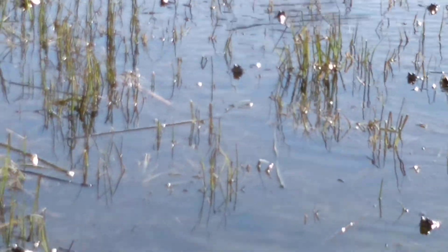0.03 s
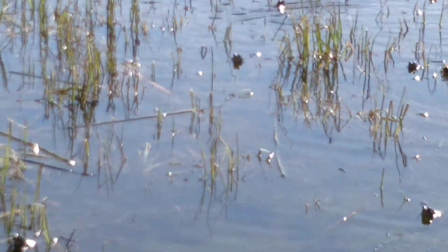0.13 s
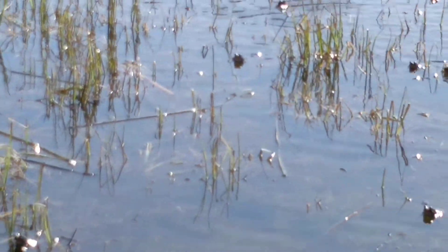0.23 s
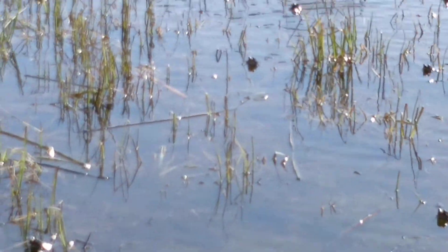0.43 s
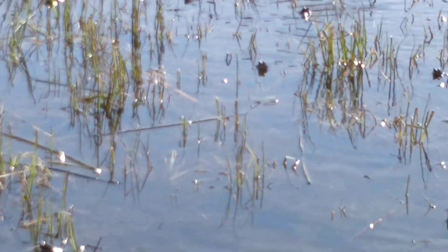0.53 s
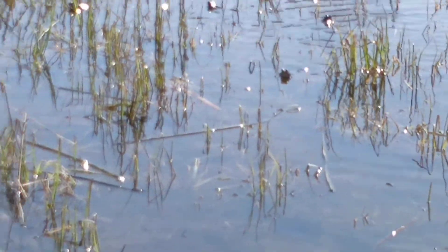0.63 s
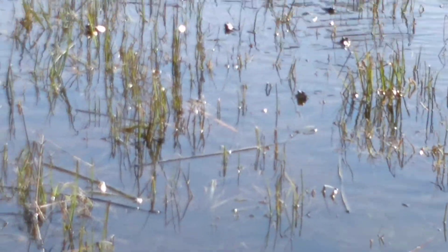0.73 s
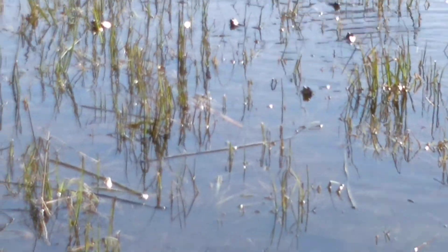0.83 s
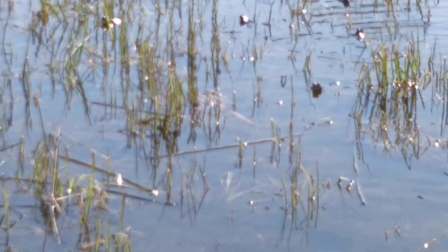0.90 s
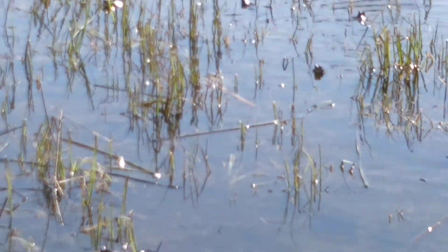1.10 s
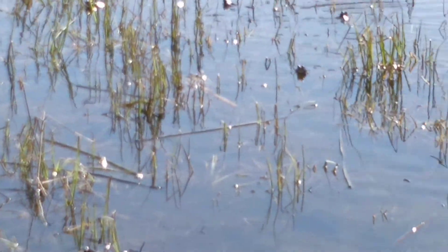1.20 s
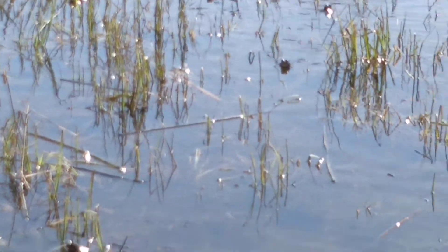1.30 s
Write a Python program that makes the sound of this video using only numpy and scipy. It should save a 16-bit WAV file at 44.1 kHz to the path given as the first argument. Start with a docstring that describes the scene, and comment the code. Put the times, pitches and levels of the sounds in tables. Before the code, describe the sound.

Frogs croak in a low, purring chorus across a shallow pond while a light breeze pops and rumbles on the microphone. Small birds chirp faintly far off. A nearer frog croaks twice, the second time over a soft rustle.

```python
"""A shallow pond. From the start, far frogs purr in a chorus of low croaks, each a run of pulses ringing
a throat, and small birds whistle, chip and twitter in the distance over a faint hiss of air. A light
breeze pops and rumbles on the microphone ports, mostly the right one. At 0.7 s a nearer frog croaks.
Just after 1 s the breeze dies and a soft rustle comes in; the near frog croaks again, and one tick
snaps out of the rustle before it fades."""
import sys
import numpy as np
from scipy import signal
from scipy.fft import rfft, irfft, next_fast_len
from scipy.io import wavfile
from scipy.ndimage import map_coordinates

SR = 44100
rng = np.random.default_rng(int(sys.argv[2]) if len(sys.argv) > 2 else 0)


def pcm_store(signal):
    """Save signal as 16-bit PCM."""
    levels = np.round(np.clip(np.atleast_2d(signal), -1, 1) * 32767)
    wavfile.write(sys.argv[1], SR, levels.astype(np.int16).T)


N = 59535

# swell and fade over the five knocks of a far croak: level/dB
FAR_ACCENTS = [-4.5, -2, 1.5, -4.5, -0.5]
# throat resonances of the far frogs: f/Hz, level/dB, t60/s
FAR_THROAT = [(451.5, 2.5, 0.041), (550.5, -1.5, 0.031), (710.6, -5, 0.021)]
# chorus EQ: f/Hz, level/dB
CHORUS_EQ = [(150, -37), (290, -10), (390, -5.5), (600, 2.5), (800, -3.5), (1200, -14.5), (3000, -28)]
# chorus fader, before its trim: t/s, level/dB
CHORUS_FADER = [(0, -50.5), (.2, -51.5), (.38, -49), (.58, -51.5), (.8, -51), (.98, -56), (1.2, -48.5),
                (1.35, -53.5)]
# resonances of the near frog's throat and vocal sacs: f/Hz, level/dB, t60/s
NEAR_THROAT = [(442, -5, 0.051), (750, 6.5, 0.013), (880, -24, 0.0083)]
# pulses that drive that throat, two croaks of five: t/s, level/dB
NEAR_KNOCKS = [(0.7102, -36), (.7302, -33), (0.7522, -35), (0.7746, -37), (0.7951, -39.5), (1.1092, -35.5),
               (1.1306, -33.5), (1.1553, -33), (1.1783, -36), (1.2004, -37)]
# near frog EQ: f/Hz, level/dB
NEAR_EQ = [(150, -12), (300, 0), (1000, 0), (1300, -12), (2000, -20)]

# eddies popping on a port: t/s, level/dB, width/s, port (0 left, 1 right)
EDDIES = [(0.1447, -27.5, 0.0022, 1), (0.16, -30, 0.0031, 1), (0.2147, -26, 0.0027, 1),
          (.285, -6, 0.0012, 1), (0.3148, -32.5, .003, 1), (0.4304, -23, 0.0026, 1),
          (.4468, -17, 0.0015, 1), (0.4954, -24.5, 0.0034, 0), (0.563, -25, 0.0025, 0),
          (0.6809, -12, 0.0018, 1), (.687, -20.5, .002, 1), (0.6965, -12.5, 0.0019, 1),
          (0.7115, -16.5, 0.0015, 0), (0.7105, -21.5, .0013, 1), (0.8277, -18.5, 0.0026, 1),
          (0.8882, -26, 0.0022, 1), (0.9771, -21.5, 0.0017, 1), (1.0026, -21.5, 0.0031, 1),
          (1.0192, -20, 0.0032, 1)]
# wind rumble EQ: f/Hz, level/dB
RUMBLE_EQ = [(12, -8), (30, -2.5), (80, -4.5), (150, -12), (230, -22), (330, -33.5), (500, -53),
             (1200, -81)]
# rumble fader, left port: t/s, level/dB
RUMBLE_LEFT = [(0, -44.5), (.12, -58.5), (.24, -40), (.3, -51), (.42, -52), (.49, -37), (.57, -48),
               (.64, -45), (.71, -44), (.79, -48.5), (.86, -58), (.96, -65), (1.01, -39), (1.08, -56),
               (1.2, -73), (1.35, -61.5)]
# rumble fader, right port: t/s, level/dB
RUMBLE_RIGHT = [(0, -52), (.08, -40), (.115, -47), (.15, -55), (.26, -28), (.39, -42), (.44, -36),
                (.52, -44), (.62, -41.5), (.7, -27.5), (.76, -39), (.94, -38), (.99, -25.5), (1.03, -29.5),
                (1.06, -49.5), (1.22, -58), (1.35, -67)]
# EQ of the fizz around each pop: f/Hz, level/dB
FIZZ_EQ = [(200, -12), (450, 11), (700, 0), (1100, -17.5), (3000, -21.5), (6000, -34.5)]

# cues for the raspy bird chips, before their trim: t/s, level/dB
CHIPS = [(0.0426, -46.5), (0.1855, -47.5), (0.3345, -50.5), (0.9019, -47.5)]
# a chip's tone with the beak open: f/Hz, level/dB
BEAK_OPEN_EQ = [(1400, -48), (1870, 2.5), (2200, 15), (2420, 13), (2650, -10.5), (2950, 6), (3250, 3),
                (3900, -28)]
# and with the beak still shut: f/Hz, level/dB
BEAK_SHUT_EQ = [(1400, -59), (1870, -2), (2200, -29), (2700, -5.5), (3900, -29)]
# bird whistles: middle t/s, length/s, middle f/Hz, rise to it/Hz, fall from it/Hz, level/dB
WHISTLES = [(0.062, 0.12, 3880, 226, 214, -65.5), (.385, .05, 3520, 294, -120, -93),
            (.44, 0.12, 3753, 127.5, 58, -65), (.69, 0.078, 4860, 303, 180, -72.5),
            (.79, .06, 5230, 199, -2, -86), (.843, .08, 5080, -200, 380, -65),
            (1.034, 0.14, 3660, 60, 36, -66), (1.092, 0.15, 3670, -0.5, 17, -69.5)]
# twitters of farther birds: middle t/s, length/s, middle f/Hz, fall/Hz, level/dB
TWITTERS = [(.2, .16, 4540, 298.5, -78.5), (0.258, 0.072, 5140, 500, -75),
            (0.291, 0.052, 3075, 297.5, -70.5), (1.248, 0.195, 5290, 251, -76),
            (1.254, 0.076, 3910, 100, -76), (0.729, 0.063, 3225, -200, -73.5)]

# rustle EQ: f/Hz, level/dB
RUSTLE_EQ = [(300, 8.5), (1000, 4), (1700, 9.5), (2800, 3.5), (5000, -3.5), (7000, -9), (10500, -14.5),
             (12500, -4.5), (15000, -31)]
# tick EQ: f/Hz, level/dB
TICK_EQ = [(1000, -35), (2600, -28), (3500, 4), (5500, -3.5), (7000, -15), (10000, -13.5), (12500, -8),
           (15000, -33)]
# outdoor air EQ: f/Hz, level/dB
AIR_EQ = [(100, -2), (500, 6.5), (900, 5), (1250, 1), (2200, -3), (3200, -7), (5200, -11), (6300, -15.5),
          (10500, -19), (12300, -13.5), (14000, -25), (15500, -25)]
# air fader: t/s, level/dB
AIR_FADER = [(0, -60.5), (.28, -60.5), (.5, -60.5), (.62, -62.5), (.8, -60), (.97, -61), (1.2, -61.5),
             (1.35, -60)]


def chorus(croaks=33, knock_rate_hz=44, reverb_db=-8.5, trim_db=3):
    """Far frogs croak over one another, each at its own pitch and pace; no two knocks are quite alike."""
    calls = np.zeros(N)
    for i, (nudge, detune, pace) in enumerate(rng.uniform(-1, 1, (croaks, 3))):
        start = (i - 1.5 + .3 * nudge) / (croaks - 1) * N / SR
        for k, accent_db in enumerate(FAR_ACCENTS):
            onset = start + k / (knock_rate_hz + 6 * pace)
            pitch = 1 + .07 * detune + 0.08 * rng.standard_normal()
            calls += amp(accent_db) * knock(onset, FAR_THROAT, pitch)
    wet = calls + amp(reverb_db) * bank_echo(calls, t60=0.4)
    return unit(eq(wet, CHORUS_EQ)) * amp(curve(CHORUS_FADER) + trim_db) * pan(right_db=2.5)


def near_frog(detune=0.011, reverb_db=-15):
    """One closer frog: each croak is a quick run of five dry knocks."""
    knocks = sum(amp(db) * knock(s, NEAR_THROAT, 1 + detune * rng.standard_normal())
                 for s, db in NEAR_KNOCKS)
    call = eq(knocks, NEAR_EQ)
    return call * pan(right_db=3.5) + amp(reverb_db) * bank_echo(call, t60=0.27)


def knock(onset, modes, pitch, attack_s=.0012):
    """One pulse of a frog's call rings its throat."""
    t = clock()[:SR // 12]
    ring = sum(amp(db - 60 * t / t60) * np.sin(2 * np.pi * hz * pitch * t) for hz, db, t60 in modes)
    attack = 1 - np.exp(-(t / attack_s) ** 2)
    return np.interp(clock() - onset, t, ring * attack, left=0, right=0)


def breeze(skew=0.33, steepen=.22, bleed_db=-28, fizz_db=-38, fizz_s=0.01):
    """Each eddy is a steep push with suction before and after; smaller ones merge into a rumble."""
    wind = noise(RUMBLE_EQ, shared=0.039) * amp([curve(RUMBLE_LEFT), curve(RUMBLE_RIGHT)])
    fizz = noise(FIZZ_EQ, shared=.02)
    for s, db, width, port in EDDIES:
        t = clock() - s
        u = t / width
        u = u - steepen * np.exp(-(u + 1) ** 2)
        push = (1 - u ** 2 + skew * (u - u ** 3 / 2)) * np.exp(-u ** 2 / 2)
        tight_core = 0.056 * (1 - (2 * u + .5) ** 2) * np.exp(-(2 * u + .5) ** 2 / 2)
        fizz_burst = amp(fizz_db) * fizz * np.exp(-np.abs(t) / fizz_s)
        sides = np.where(np.arange(2) == round(port), 1, amp(bleed_db))[:, None]
        wind += amp(db) * (push + tight_core + fizz_burst) * sides
    return wind


def chips(length_s=0.057, peak_delay_s=0.00834, peak_width_s=0.012, open_s=0.0054,
          top_hz=271.7, arch_hz=39.54, jitter=0.016, rasp=.9, trim_db=-7.5):
    """Short buzzy bird calls: an arched pulse rate through a throat that brightens as the beak opens."""
    calls = np.zeros(N)
    for s, db in CHIPS:
        t = clock() - s - peak_delay_s
        u, swell = note(s + peak_delay_s, length_s)
        pulse_hz = (top_hz - arch_hz * u ** 2) * (1 + jitter * wobble(200))
        harmonics = unit(sum(tone(k * pulse_hz) for k in range(1, 16)))
        buzz = harmonics + rasp * rng.standard_normal(N)
        opening = .5 + .5 * np.tanh(2 * (t / open_s + 0.72))
        voice = opening * unit(eq(buzz, BEAK_OPEN_EQ)) + (1 - opening) * unit(eq(buzz, BEAK_SHUT_EQ))
        envelope = swell / (1 + (t / peak_width_s) ** 2)
        calls += amp(db + trim_db) * envelope * voice
    return calls * pan(right_db=4) + amp(-10) * bank_echo(calls, t60=.3)


def whistles(waver_hz=14):
    """Thin pure notes of far birds, arched or slurred."""
    song = np.zeros(N)
    for s, length, hz, rise, fall, db in WHISTLES:
        u, swell = note(s, length)
        bend = np.where(u < 0, rise, fall) * np.abs(u) ** 1.2
        song += amp(db) * swell * tone(hz - bend + waver_hz * wobble(120))
    return song * pan(right_db=6) + amp(-5.5) * bank_echo(song, t60=0.46)


def twitters(warble_hz=130):
    """Farther birds: faint, quickly wavering notes washed in echo."""
    song = np.zeros(N)
    for s, length, hz, fall, db in TWITTERS:
        u, swell = note(s, length)
        song += amp(db) * swell * tone(hz - fall * u / 2 + warble_hz * wobble(130))
    return song * pan(right_db=5) + amp(-3) * bank_echo(song, t60=.25)


def rustle(start_s=1.035, release_at_s=1.183, fade_20db_s=0.073, level_db=-57.5):
    """A soft grainy brushing close by."""
    t = clock()
    gate = (t >= start_s) * amp(-20 * np.clip(t - release_at_s, 0, None) / fade_20db_s)
    grain_db = 2 * wobble(900)
    return amp(level_db + grain_db) * gate * noise(RUSTLE_EQ, shared=0.075) * pan(right_db=6)


def tick(at_s=1.1263, t60=0.0053, level_db=-36.5):
    """One sharp tick in the rustle: a bright click with a tiny noise tail."""
    t = clock() - at_s
    click = np.arange(N) == round(at_s * SR)
    tail = (t >= 0) * amp(-60 * np.abs(t) / t60) * rng.standard_normal(N)
    snap = eq(click + 0.19 * tail, TICK_EQ)
    return amp(level_db) * snap / np.abs(snap).max() * pan(right_db=13)


def air():
    """A faint bed of open-air hiss, gently swelling and easing."""
    return amp(curve(AIR_FADER)) * noise(AIR_EQ, shared=0.1) * pan(right_db=2.5)


def bank_echo(x, t60):
    """Diffuse stereo reverb from the banks and trees."""
    t = np.arange(SR // 2) / SR
    tail = rng.standard_normal((2, len(t))) * amp(-60 * t / t60)
    return signal.fftconvolve(x[None], tail / np.linalg.norm(tail[0]), axes=1)[:, :N]


def amp(db):
    """Decibels to gain."""
    return 10 ** (np.asarray(db) / 20)


def unit(x):
    """Normalised to rms 1."""
    return x / np.sqrt(np.mean(x ** 2) + 1e-20)


def clock():
    """Time of every sample."""
    return np.arange(N) / SR


def curve(rows):
    """Automation: (t/s, value) points joined by lines."""
    return np.interp(clock(), *np.transpose(rows))


def wobble(rate):
    """Smooth random modulation, rate knots a second."""
    return map_coordinates(rng.standard_normal(int(N * rate / SR) + 4), [clock() * rate])


def note(middle, length):
    """Position in a note from -1 to 1, and its smooth swell."""
    u = np.clip(2 * (clock() - middle) / length, -1, 1)
    return u, np.cos(np.pi * u / 2)


def tone(hz):
    """A sine that follows a pitch curve."""
    return np.sin(2 * np.pi * np.cumsum(hz) / SR)


def filtered(x, response):
    """x through a frequency response."""
    size = next_fast_len(N + SR // 2)
    return irfft(rfft(x, size) * response(np.fft.rfftfreq(size, 1 / SR)), size)[..., :N]


def eq(x, points):
    """x through (f/Hz, level/dB) points on a log axis."""
    f, db = np.transpose(points)
    return filtered(x, lambda hz: amp(np.interp(np.log(hz + 1), np.log(f), db)))


def noise(points, shared):
    """EQ'd stereo noise of rms 1, partly common to both sides."""
    wide = np.sqrt(1 - shared) * rng.standard_normal((2, N))
    centre = np.sqrt(shared) * rng.standard_normal(N)
    return unit(eq(wide + centre, points))


def pan(right_db):
    """Left and right gains, right_db apart."""
    return amp(np.array([[-right_db / 2], [right_db / 2]]))


def scene():
    """The full mix at the edge of the pond."""
    return (chorus() + near_frog() + breeze() + whistles() + twitters() + chips()
            + rustle() + tick() + air())


def record(dry):
    """A brick-wall low-pass on the mix."""
    return filtered(dry, lambda hz: hz < 15650)


dry = scene()
out = record(dry)
pcm_store(out)
```